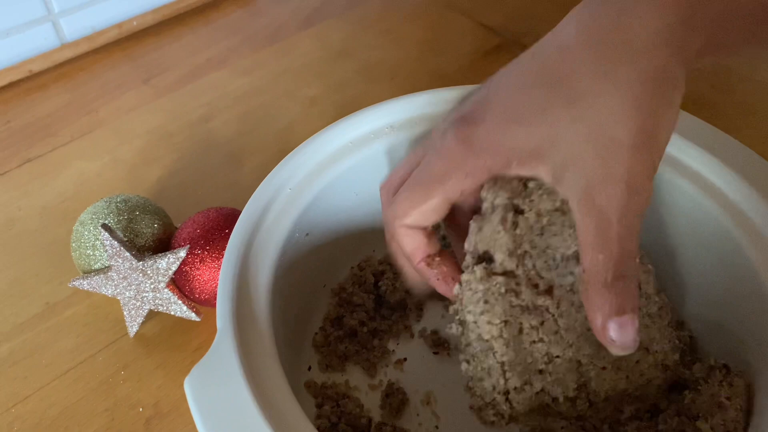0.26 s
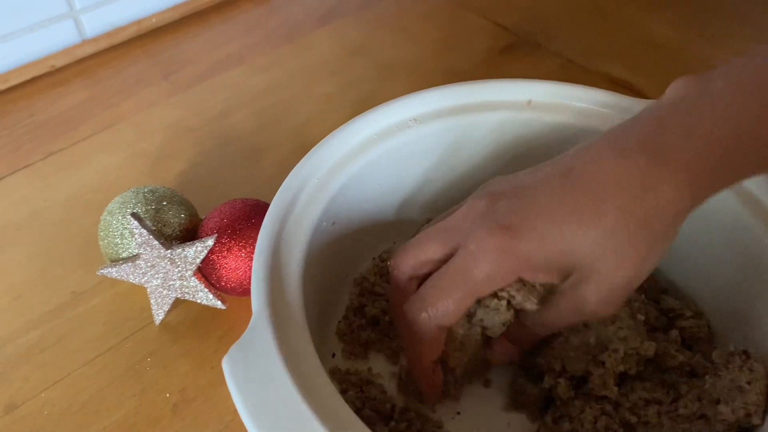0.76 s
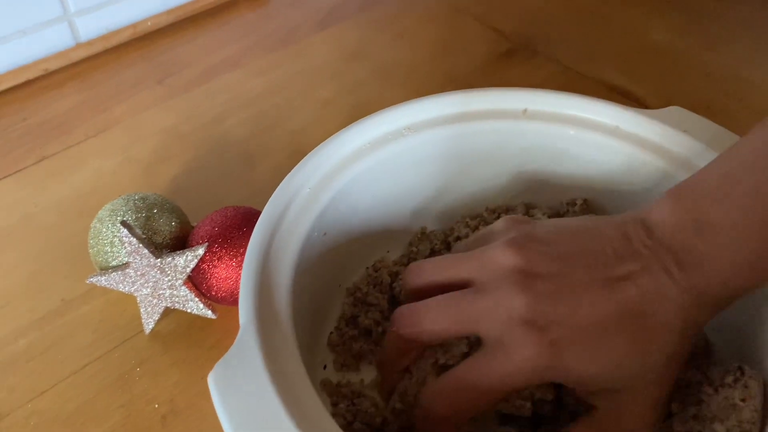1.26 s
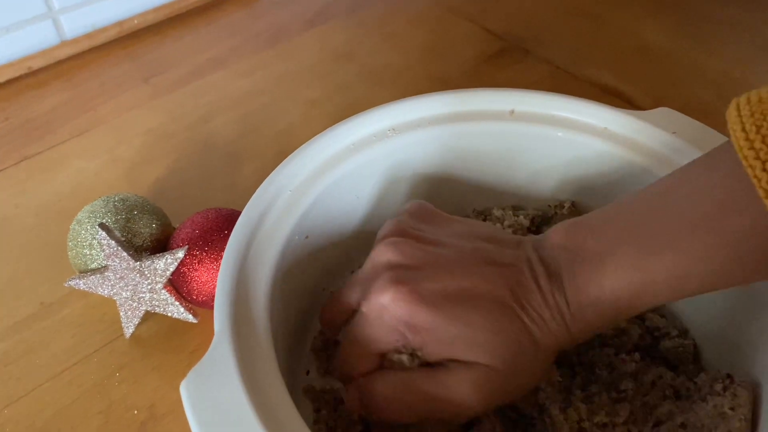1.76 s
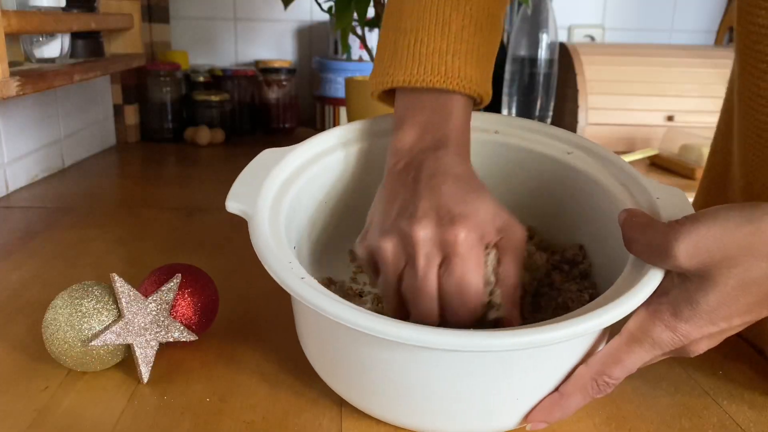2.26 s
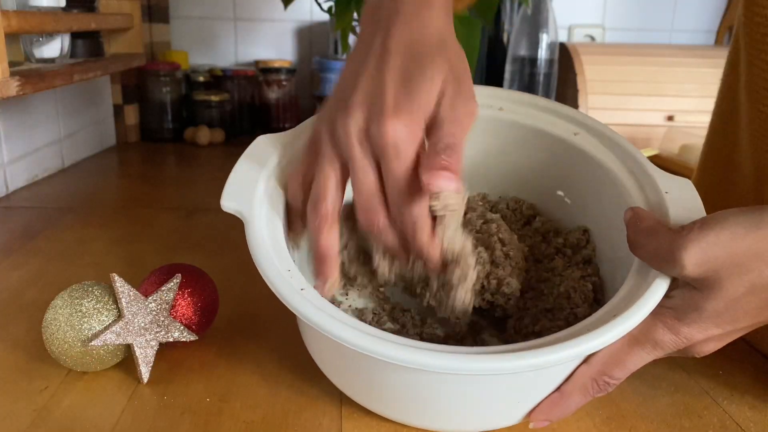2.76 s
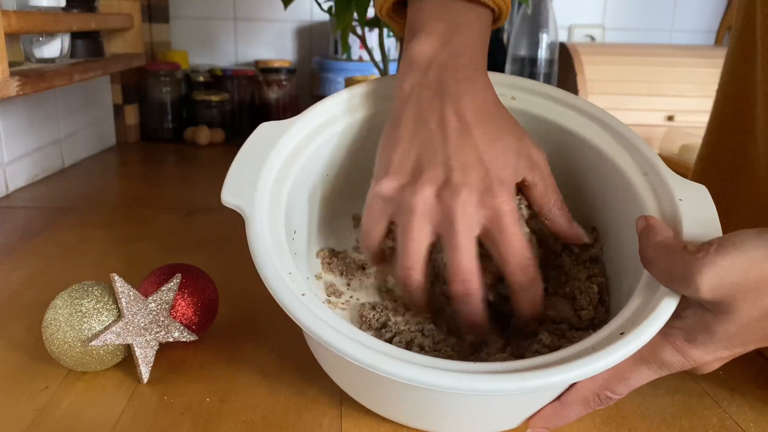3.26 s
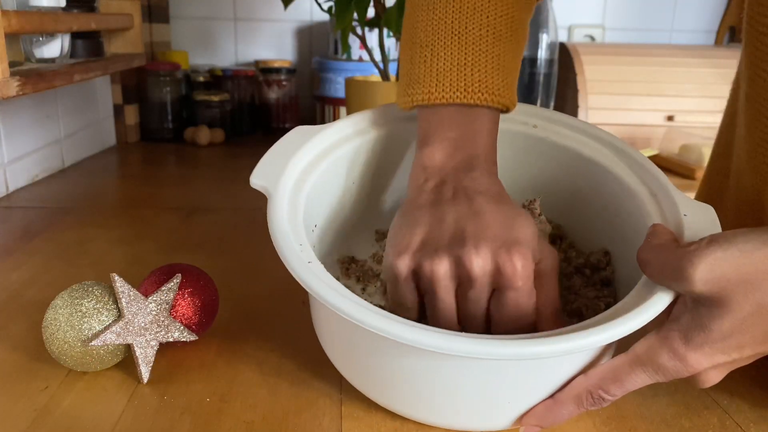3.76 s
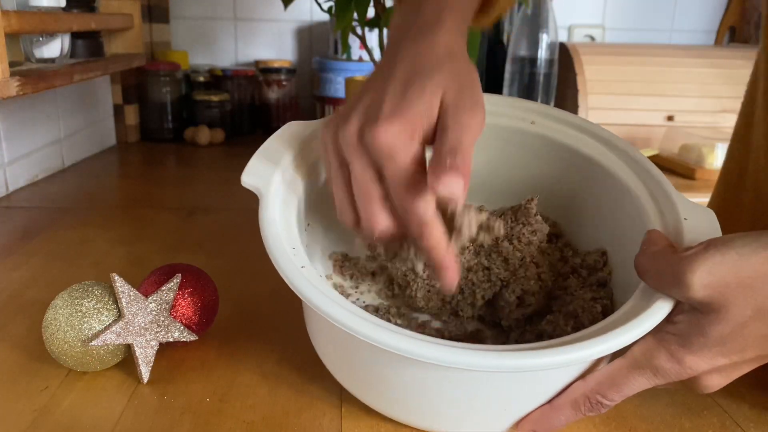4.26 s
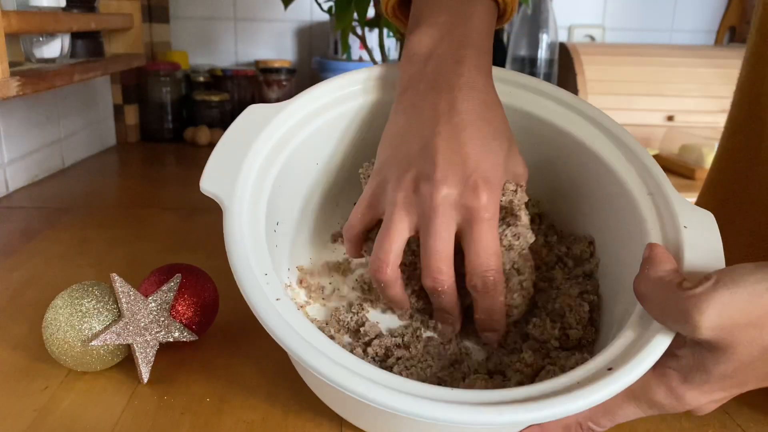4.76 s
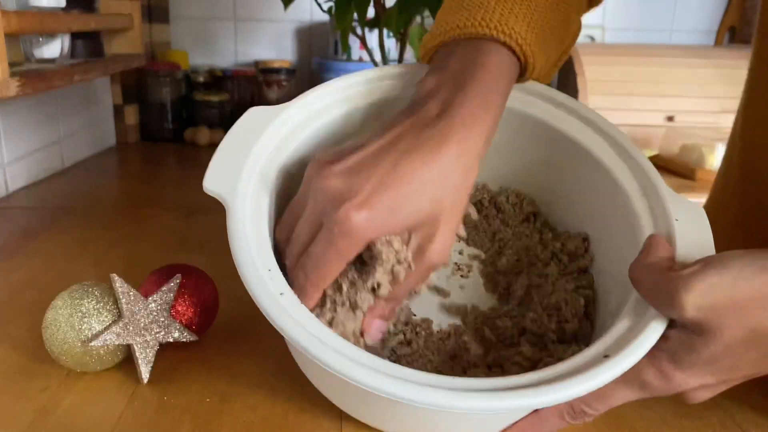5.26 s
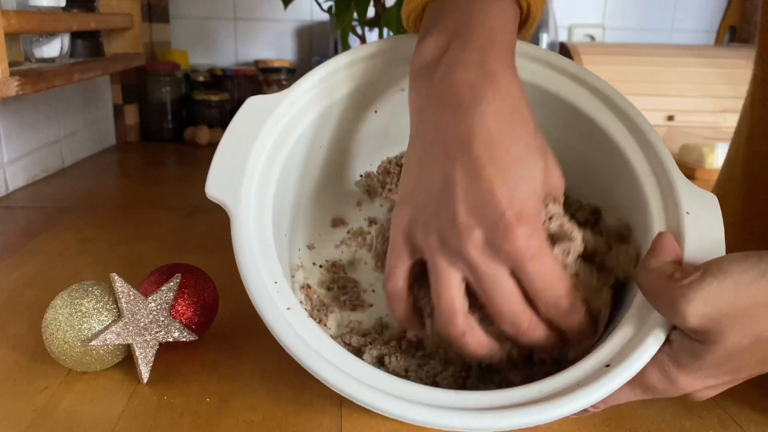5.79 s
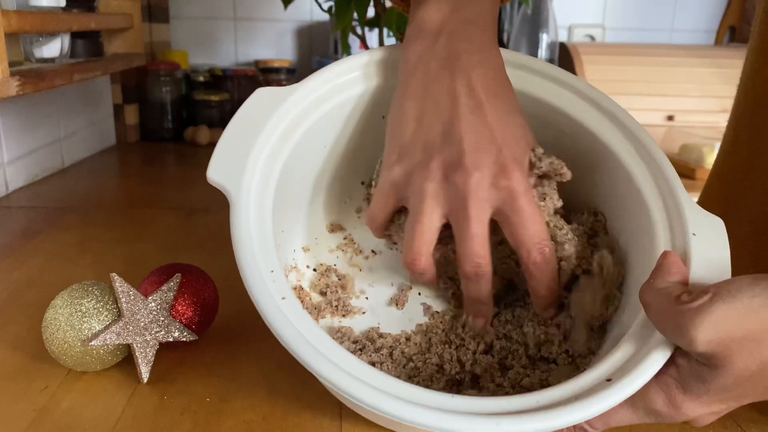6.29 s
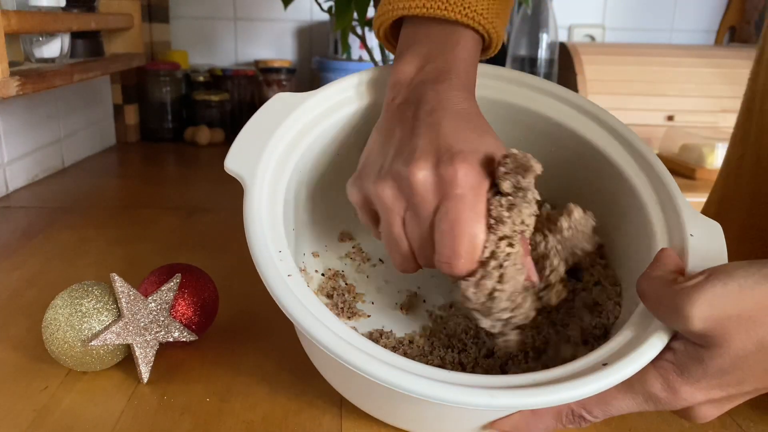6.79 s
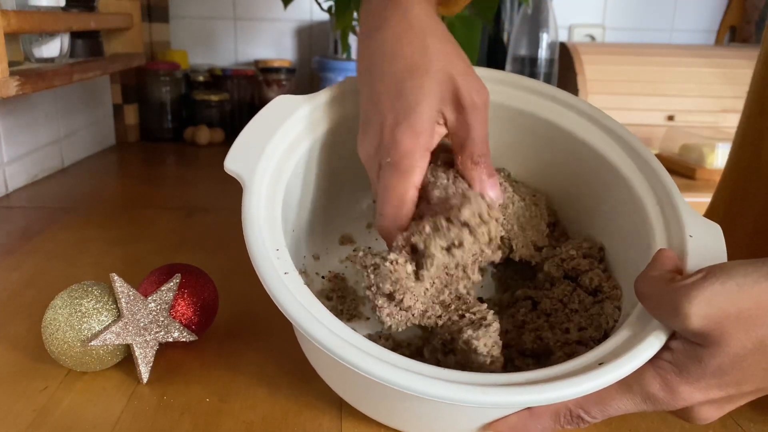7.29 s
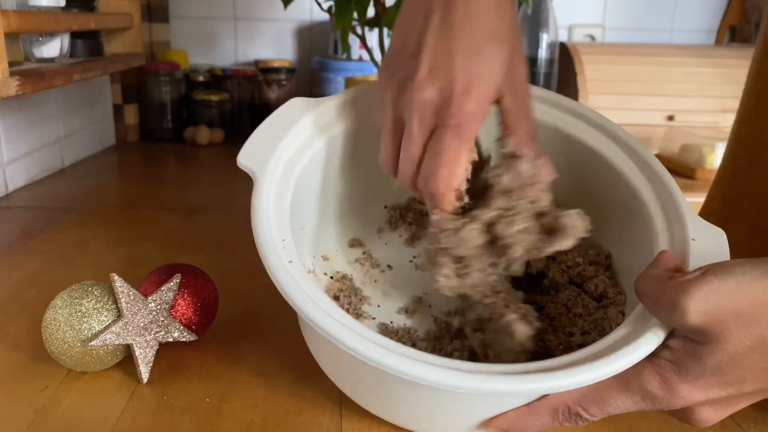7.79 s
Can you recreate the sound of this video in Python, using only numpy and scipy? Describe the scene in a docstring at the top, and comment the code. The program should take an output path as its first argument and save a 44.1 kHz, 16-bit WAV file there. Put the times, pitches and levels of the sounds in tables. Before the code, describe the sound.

Quiet, close kneading of crumbly dough: faint grainy squishes and low table thuds, a hard hollow ceramic clonk, then lighter crumbling in a kitchen.

```python
"""Kneading crumbly dough in a bowl

A hand kneads crumbly dough in a ceramic bowl on a wooden table in a quiet kitchen.
Lumps and knuckles strike ringing modes of the bowl; each push thumps low modes of the table top.
Dragged dough keeps the bowl wall and the table sounding with dense small slips; crumbs rustle as random clicks.
Feedback delays give the kitchen's echo and steady noise its room tone; a pair of close microphone ports listens."""
import sys
import numpy as np
from scipy import signal
from scipy.fft import rfft, irfft, next_fast_len
from scipy.io import wavfile

SR = 44100
rng = np.random.default_rng(int(sys.argv[2]) if len(sys.argv) > 2 else 0)


def wrap_up_sound(samples):
    """Save the sound to the file named by the first command line argument, as 16-bit audio."""
    columns = np.atleast_2d(samples).T
    # keep every value between -1 and 1, then stretch to whole-number steps
    tamed = np.clip(columns, -1, 1)
    steps = np.round(tamed * 32767).astype(np.int16)
    wavfile.write(sys.argv[1], SR, steps)


N = 354563
SIZE = next_fast_len(N + 4096)   # padded transform length [samples]
BINS_HZ = np.maximum(np.arange(SIZE // 2 + 1) * SR / SIZE, 10)
SIDE_VIEW_S = 1.885   # from here on the bowl is heard from its side instead of from above

# Ringing modes of the bowl, low to top:
# (frequency [Hz], level from above [dB], level from the side [dB], decay by 60 dB [s])
BOWL_LOW_MODES = [(477, 5, -9.5, 0.056), (560, -7, -0.5, 0.06), (604.8, 1, -7.5, 0.092),
                  (637, -7, -2.5, 0.06), (679, -0.5, -2, 0.071), (739.3, 1, -6.5, 0.056),
                  (794, -41, -6.5, 0.017), (869, -1, -18.5, 0.084)]
# same columns: (frequency [Hz], level from above [dB], level from the side [dB], decay by 60 dB [s])
BOWL_HIGH_MODES = [(945, -7, -16, 0.036), (1072, -1.5, 3.5, .07), (1173, 3.5, 0.5, 0.043),
                   (1272, -3.5, -6, 0.09), (1454, -4.5, -14.5, 0.057), (1797, -13, 2.5, 0.043),
                   (1973, -11, 1.5, 0.021)]
# same columns: (frequency [Hz], level from above [dB], level from the side [dB], decay by 60 dB [s])
BOWL_TOP_MODES = [(2479, -11, 0.5, 0.056), (2636, -6, -8, .04), (3030, -27, 0, 0.024), (3510, -26, -8, .05),
                  (4597, -2, -6.5, 0.068), (4950, 2.5, -8, 0.04)]
# Modes of the table top, deep boom:
# (frequency [Hz], level from above [dB], level from the side [dB], decay by 60 dB [s])
TABLE_LOW_MODES = [(62.4, -4, -3.5, 0.18), (96.8, -0.5, -3, 0.15)]
# Modes of the table top, upper thud:
# (frequency [Hz], level from above [dB], level from the side [dB], decay by 60 dB [s])
TABLE_HIGH_MODES = [(139.5, 1.5, 2, 0.099), (165, -8, -5, 0.13), (196, -1, -4, 0.14), (258, 5, -5, .08),
                    (309, 3.5, -6, 0.075), (368, -1.7, -4.5, 0.0796), (420, -0.9, -1, 0.06)]
# Pushes on the table, before layer trims: (time [s], level [dB], upper modes relative to it [dB])
PUSHES = [(0.119, -47, -20), (0.14, -43, -39), (0.622, -48, 1.5), (0.638, -41.5, -15), (0.659, -40, -16),
          (0.799, -50.5, -4.5), (0.857, -46.5, -16), (1.018, -42, -16), (1.066, -41.5, -4),
          (1.133, -29, -7.5), (1.148, -26.5, -14.5), (1.419, -47.5, 2), (1.437, -37.5, -13.5),
          (1.966, -59.5, -9), (2.428, -40.5, -14), (2.615, -53, -13), (2.949, -31.5, -36),
          (3.029, -50, -15), (3.205, -45.5, -5.5), (3.414, -44.5, -9.5), (3.464, -46.5, -6.5),
          (3.994, -39.5, -22.5), (4.028, -56, -26), (4.423, -44, -11), (4.432, -22.5, -8),
          (5.182, -17, -2.5), (5.638, -44, -25), (5.918, -38.5, -13.5), (5.977, -26.5, -7),
          (6.159, -40, -14.5), (6.946, -53, -15), (7.124, -56, -25.5), (7.898, -66.5, 2.5)]
# Dough drags along the wall, before layer trims:
# (time [s], hold [s], wall level [dB], upper wall modes relative to it [dB], load on the table [dB])
DRAG_STROKES = [(0.157, 0.011, -71.5, -7, -48), (0.35, 0.011, -73, 2, -86), (0.632, 0.033, -57.5, 2.5, -47),
                (0.814, 0.023, -69.5, -5, -47.5), (1.092, 0.11, -59, -23, -41.5),
                (1.364, 0.0071, -78, 4, -76), (1.444, .01, -57.5, -11, -52), (1.68, .01, -75, -4, -75),
                (1.955, 0.027, -59, -2, -56), (2.076, 0.087, -60, -24, -60), (2.389, .01, -56, -14, -66),
                (2.526, 0.11, -73.5, -7.5, -70), (2.736, 0.032, -65, -6, -70),
                (2.977, .11, -67, -20, -55.5), (3.196, 0.071, -61, -8.5, -62), (3.382, 0.011, -61, -5, -77),
                (3.581, 0.017, -57, -10, -62.5), (4.03, 0.023, -58.5, -8.5, -57.5),
                (4.38, 0.039, -74, -12, -46), (4.473, 0.019, -49.5, -8, -38.5), (4.578, 0.14, -62, -5, -53),
                (4.856, 0.2, -69.5, -5, -77), (5.078, 0.024, -71, -10, -75), (5.12, .04, -57, -18.5, -73),
                (5.21, .01, -36, -13.5, -37), (5.25, .02, -42.5, -12, -41.5),
                (5.319, 0.044, -37.5, -14.5, -45.5), (5.46, 0.14, -53.5, -5.5, -54.5),
                (5.632, 0.045, -49.5, -17, -48.5), (5.742, 0.026, -51.5, -14.5, -54),
                (5.93, 0.025, -50.5, -5.5, -39.5), (6.118, 0.014, -42.5, -28, -40),
                (6.217, 0.032, -57, -5, -44), (6.347, .01, -57, -15, -58.5), (6.45, 0.3, -71.5, -9, -71),
                (6.839, 0.0071, -66.5, -7, -83), (7.019, 0.0069, -70, 0, -65.5),
                (7.146, 0.015, -69.5, -11, -67), (7.348, 0.22, -77.5, -9.5, -87),
                (7.96, .02, -69.5, -11.5, -73)]


def knocks():
    """Each knock rings the bowl modes, with a dull puff of dough and a snap of crushed crumbs."""
    # Knocks on the bowl, before layer trims: (time [s], level [dB], upper modes relative to it [dB],
    # snap relative to it [dB], favoured pitch before a 40 Hz lift [Hz])
    knock_list = [(0.151, -63.5, 5, -9, 651), (0.344, -63, 13, 10.5, 525), (0.361, -60.5, -21, 6.5, 750),
                  (0.493, -84, 8, 22, 716), (0.588, -62, 6.5, 9, 510), (0.62, -49, -20, -23, 493),
                  (0.698, -65, 7, 7, 622), (0.8, -58, 0.5, -2, 504), (1.066, -45, -4.5, -15.5, 470),
                  (1.133, -34, -8, -29, 490), (1.418, -43.5, -21, -34, 500), (1.689, -69, 10, -1, 525),
                  (1.941, -46.5, 1.5, -3.5, 555), (1.955, -46.5, 3, 2.5, 616), (1.972, -46, 1, 1, 569),
                  (1.991, -44, 0, -5, 575), (2.067, -42, -2, -8.5, 550), (2.158, -57.5, 7, -5, 716),
                  (2.372, -50, -22, -10, 543), (2.697, -47.5, -27, -6.5, 562),
                  (3.009, -47.5, -33, -22, 745), (3.029, -63, -11, 2.5, 616), (3.18, -53, -1.5, -6, 556),
                  (3.209, -53.5, 5, -1, 695), (3.253, -60, -1.5, 9, 534), (3.366, -56.5, 8.5, 8, 581),
                  (3.398, -56, 2, 1, 598), (3.466, -53, -5, -7, 598), (3.58, -52.5, -6.5, -29, 761),
                  (3.669, -63, -3, -11, 563), (3.987, -66, 12, 16.5, 627), (4.044, -46, -24, -14, 710),
                  (4.371, -47.5, -31, -32, 560), (4.434, -27, -30, -23.5, 519.2),
                  (4.597, -50, -7, -14, 740), (4.721, -52, -8.5, -3, 715), (5.113, -49.5, -21, -9, 660),
                  (5.179, -3, -25, -28, 548), (5.309, -36, -13, -21, 592), (5.447, -41, -24, -8, 600),
                  (5.644, -42.5, -32.5, 1.5, 574), (5.91, -54, -14.5, 3, 538), (5.98, -30, -36, -43, 521.6),
                  (6.113, -47, -47, -29, 550), (6.206, -42, -16, -7, 645), (6.213, -38.5, -26, 0.5, 650),
                  (6.219, -47.5, -6, 15, 660), (6.221, -22.5, -22, -44, 693.7), (6.228, -35, -37, -27, 720),
                  (6.319, -50.5, -13, -9, 702), (6.387, -51, -13, -11, 731), (6.453, -53.5, -18.5, -6, 560),
                  (6.591, -50.5, -12, -10, 585), (6.82, -54.5, -19.5, -3.5, 686), (6.84, -51, -9, -1, 666),
                  (6.939, -59.5, -11.5, -19.5, 664), (6.998, -54.5, -15, -0.5, 680),
                  (7.149, -58.5, -2.5, -4, 674), (7.46, -62, -6, 19.5, 713),
                  (7.535, -56.5, -29, -21.5, 708), (7.943, -59.5, -11, -5, 719),
                  (8.017, -56.5, -38, -31.5, 565)]
    # Dull puff of a landing lump: (frequency [Hz], density [dB per Hz])
    thud_spectrum = [(300, -13.5), (700, -2.5), (1100, 3.4), (1600, -5), (2600, -18), (6000, -34.5)]
    # Snap of crushed crumbs: (frequency [Hz], density [dB per Hz])
    snap_spectrum = [(900, -9.5), (1800, -6), (2800, 2.5), (5000, -5.5), (9000, -9), (16000, -16)]
    seconds, level_db, upper_db, snap_db, low_hz = np.transpose(knock_list)

    # the left-right place and the favoured top pitch scatter from knock to knock
    pan_luck, pitch_luck = rng.standard_normal((2, len(seconds)))
    pan_db = heard_db(seconds, -2, 2.5) + 2.5 * pan_luck
    top_hz = 2900 * 2 ** (0.097 * pitch_luck)

    low = struck(BOWL_LOW_MODES, seconds, level_db + 3.0, pan_db, contact_s=.00008, chatter_s=0.00021,
                 scatter_db=1.4, port_s=.00025, favour_hz=low_hz + 40, focus_db=32)
    high = struck(BOWL_HIGH_MODES, seconds, level_db + upper_db + 4, pan_db / 2, contact_s=.000012,
                  chatter_s=.00012, scatter_db=1.8, port_s=0.00043, favour_hz=1110)
    top = struck(BOWL_TOP_MODES, seconds, level_db + snap_db - 7.5, pan_db / 2, contact_s=.00002,
                 chatter_s=.0015, scatter_db=2.9, port_s=.00005, favour_hz=top_hz, focus_db=16.0)
    thud = puff(seconds, level_db + 0.49 * upper_db - 12.5, .0005, 0.019, thud_spectrum)
    snap = puff(seconds, level_db + snap_db - 7.5, 0.00035, 0.0053, snap_spectrum)
    return low + high + top + thud + snap


def thumps():
    """Soft pushes set the table top ringing: its deep boom and its upper thud, apart."""
    seconds, level_db, upper_db = np.transpose(PUSHES)
    boom = struck(TABLE_LOW_MODES, seconds, level_db + 2.0, np.full(len(seconds), 1.5), contact_s=0.0017,
                  chatter_s=0.0022, scatter_db=.8, port_s=0.00017, favour_hz=80)
    thud = struck(TABLE_HIGH_MODES, seconds, level_db + upper_db + 10.0, np.full(len(seconds), .8),
                  contact_s=0.00017, chatter_s=.008, scatter_db=1.9, port_s=.0005, favour_hz=230)
    return boom, thud


def wall_drag(rustle_db):
    """Dragged dough slips along the bowl wall and keeps its modes sounding."""
    seconds, hold_s, wall_db, upper_db, _ = np.transpose(DRAG_STROKES)
    rise_s, fall_s = 0.0706, .1   # time to grow or fade by 20 dB
    wall = strokes(seconds, wall_db, rise_s, hold_s, fall_s, rest_db=-93.5)
    upper = strokes(seconds, wall_db + upper_db, rise_s, hold_s, fall_s, rest_db=-97.5)
    # the top modes sing when crumbs scrape while the wall is loaded
    top = 0.83 * rustle_db + 0.31 * np.minimum(wall, -52) - 0.5
    return (rubbed(BOWL_LOW_MODES, wall - 3, per_s=900, spread_db=1.2, patchy_db=2.6)
            + rubbed(BOWL_HIGH_MODES, upper - 3, per_s=1500, spread_db=4.1, patchy_db=3.0)
            + rubbed(BOWL_TOP_MODES, top, per_s=2300, spread_db=1.4, patchy_db=2.9))


def table_rumble():
    """The loaded table rumbles under the drags; its upper modes also shake on after each push."""
    seconds, hold_s, wall_db, _, load_db = np.transpose(DRAG_STROKES)
    push_s, push_db, push_upper_db = np.transpose(PUSHES)
    # rise and fall are times for 20 dB
    low = strokes(seconds, load_db, 0.02, hold_s, 0.1314, rest_db=-78.5)
    shake_s = np.r_[seconds, push_s]
    shake_hold_s = np.r_[hold_s, 0 * push_s]
    shake_db = np.r_[wall_db - 4, push_db + push_upper_db - 3.5]
    upper = strokes(shake_s, shake_db, .012, shake_hold_s, 0.12, rest_db=-88)
    return (rubbed(TABLE_LOW_MODES, low - 3, per_s=390, spread_db=2.2, patchy_db=2.3)
            + rubbed(TABLE_HIGH_MODES, upper - 3, per_s=600, spread_db=3.0, patchy_db=0.61))


def rustling():
    """Level of the crumbs as they shift, and of their top treble relative to that, both in dB."""
    # Crumb shifts, before layer trims: (time [s], level [dB], top treble relative to it [dB],
    # rise by 20 dB [s], hold [s], fall by 20 dB [s])
    rustle_list = [(0.022, -63.5, -5.5, 0.017, .002, 0.022), (0.378, -63, -10.5, 0.01, 0.0022, 0.021),
                   (0.472, -80.5, 4.5, 0.12, 0.051, 0.19), (0.641, -61, -8.5, 0.22, 0.017, 0.065),
                   (0.784, -73.5, -1.5, 0.15, .005, 0.093), (1.063, -79, -6, .02, .005, 0.077),
                   (1.13, -71.5, -3, 0.026, 0.6, 0.21), (1.39, -68.5, -3, 0.12, .01, .3),
                   (1.954, -73, -3.5, 0.19, 0.42, 0.18), (2.394, -69, -14, 0.11, 0.066, .05),
                   (2.587, -63.5, -10, .15, 0.061, 0.048), (2.693, -67.5, -4, 0.023, 0.11, 0.12),
                   (2.942, -78.5, -3, .04, .005, 0.054), (3.024, -77.5, -9, 0.041, .01, 0.16),
                   (3.207, -75.5, -6, .07, 0.76, 0.11), (3.378, -70.5, -11, .04, .005, .12),
                   (3.989, -57, -9.5, 0.012, 0.0053, 0.15), (4.344, -85, 6, 0.035, 0.024, .1),
                   (4.433, -67, -10.5, 0.097, .005, 0.47), (4.616, -62.5, -9, 0.032, .004, 0.063),
                   (4.714, -70.5, -7, 0.069, .14, 0.2), (5.005, -75.5, -7.5, 0.11, 0.056, .2),
                   (5.193, -56.5, -15.5, 0.097, 0.021, 0.11), (5.351, -53, -13, 0.13, .004, 0.044),
                   (5.55, -53, -11, 0.33, 0.091, 0.24), (5.705, -61, -4.5, 0.082, 0.019, 0.087),
                   (5.944, -58.5, -10.5, 0.067, 0.0045, 0.05), (6.1, -75, -8.5, .2, 0.11, .1),
                   (6.228, -62, -15, 0.058, .004, 0.12), (6.462, -67.5, -7.5, 0.52, 0.26, 0.33),
                   (6.896, -68.5, -9.5, 0.32, .015, .08), (7.027, -63.5, -6, .07, 0.047, 0.081),
                   (7.138, -76.5, -2.5, .1, 0.072, 0.61), (7.478, -70.5, -4.5, 0.11, .01, 0.44),
                   (7.83, -80.5, 2.5, 0.22, .01, 0.033), (7.945, -65, -8.5, .04, .002, 0.026)]
    seconds, level_db, top_db, rise_s, hold_s, fall_s = np.transpose(rustle_list)
    rustle = strokes(seconds, level_db, rise_s, hold_s, fall_s, rest_db=-100)
    top = strokes(seconds, level_db + top_db, rise_s, hold_s, fall_s, rest_db=-88)
    return rustle, top - rustle


def crumbs(level_db, top_db):
    """Dry crumbs shift and crush: dense grains and sparser crackles; each band swells in its own patches."""
    # Colour of the rustle: (frequency [Hz], density [dB per Hz])
    crumb_spectrum = [(700, -23.5), (1500, -13), (2300, -7), (3500, -2), (6000, -4.5), (9000, 1),
                      (12500, -0.5), (16000, -4)]
    hiss = rms_one(grains(27000, 0.87)) * amp(0.73 * drift(34))
    crackle = amp(-10.0) * rms_one(grains(300 * amp(4.5 * drift(8.68)), 4.0))
    spectrum = rfft(rms_one(coloured(hiss + crackle, crumb_spectrum)), SIZE)
    place = 2 * np.log2(np.clip(BINS_HZ, 1500, 8500) / 1500)   # half octaves above 1500 Hz
    out = 0
    for k in range(6):   # overlapping half-octave bands; the last holds the top treble
        weight = np.maximum(1 - np.abs(np.minimum(place, 5) - k), 0)
        band = irfft(spectrum * weight, SIZE)[:, :N]
        swell_db = top_db + 3.5 if k == 5 else 2.5 * drift(21)
        out = out + band * amp(swell_db)
    return amp(level_db + 5.5) * out


def kitchen(x):
    """Room echo: six feedback delays a side, duller on every round."""
    t60_s, wall_cut_hz = 0.44, 4340   # decay before the dulling; corner of the dulling
    size = next_fast_len(N + SR)
    w = 2 * np.pi * np.arange(size // 2 + 1) / size
    dull = 1 / (1 + 1j * w * SR / (2 * np.pi * wall_cut_hz))
    tails = np.zeros((2, len(w)), complex)
    for k, lag in enumerate(rng.uniform(.009, 0.032, 12) * SR):
        once = amp(-60 * lag / SR / t60_s) * dull * np.exp(-1j * w * lag)
        tails[k % 2] += (-1) ** (k // 2) * once / (1 - once)   # endless rounds of one delay
    return irfft(rfft(x, size) * tails, size)[:, :N]


def room_tone():
    """Steady quiet noise of the room: very dense random clicks, coloured."""
    # Colour of the room tone: (frequency [Hz], density [dB per Hz])
    air_spectrum = [(15, -24), (25, -1.5), (76, 1), (220, -12), (460, -14.5), (650, -13.5), (830, -20.5),
                    (1100, -19), (1630, -28), (2500, -29), (8000, -30), (16000, -31.5)]
    return amp(-73) * rms_one(coloured(grains(60000, 0.66), air_spectrum))


def struck(modes, seconds, peak_db, pan_db, contact_s, chatter_s, scatter_db, port_s, favour_hz, focus_db=0):
    """A blow is a smooth push and three weaker touches; it strikes every mode with a strength of its own."""
    hz, above_db, side_db, t60 = np.transpose(modes)[:, :, None]
    octaves = np.log2(hz / favour_hz)
    # the place of the blow favours one pitch
    mode_db = heard_db(seconds, above_db, side_db) - focus_db * np.abs(octaves)
    gains = amp(mode_db + scatter_db * rng.standard_normal((len(modes), len(seconds))))
    # modes under and over that pitch start in opposition, so the ring swells
    gains = np.sign(octaves) * gains / gains.sum(axis=0) * amp(peak_db)
    later = rng.random((3, len(seconds))) * chatter_s
    # each mode radiates from its own part of the body
    port_lags = rng.uniform(-port_s, port_s, len(modes)) * SR
    out = np.zeros((2, N))
    for gain, mode_hz, mode_t60, port_lag in zip(gains, hz[:, 0], t60[:, 0], port_lags):
        force = np.zeros((2, N + SR))
        for lag, share in zip([0, *later], [1, 0.74, -0.54, 0.56]):
            at = np.round((seconds + lag) * SR).astype(int)
            np.add.at(force, (slice(None), at), share * panned(pan_db) * gain)
        force[1] = np.roll(force[1], round(port_lag))
        out += ring(force[:, :N], mode_hz, mode_t60)
    r = np.exp(-1 / (contact_s * SR))   # the contact time smooths the push
    return signal.lfilter([(1 - r) ** 2], [1, -2 * r, r * r], out)


def rubbed(modes, level_db, per_s, spread_db, patchy_db):
    """Dense small slips keep the modes of a body sounding."""
    slips = grains(per_s, spread_db) * amp(patchy_db * drift(25))
    t = np.arange(N) / SR
    rings = 0
    for k, (hz, above_db, side_db, t60) in enumerate(modes):
        rings = rings + (-1) ** k * amp(heard_db(t, above_db, side_db)) * ring(slips, hz, t60)
    # even loudness before and after the view changes to the side, then the level curve
    cut = round(SIDE_VIEW_S * SR)
    return amp(level_db) * np.hstack([rms_one(rings[:, :cut]), rms_one(rings[:, cut:])])


def puff(seconds, peak_db, rise_s, fall_s, spectrum):
    """A burst of noise at every blow, rising fast and dying away exponentially."""
    starts = np.zeros(N)
    np.add.at(starts, np.round(seconds * SR).astype(int), amp(peak_db))
    rise, fall = np.exp(-1 / (rise_s * SR)), np.exp(-1 / (fall_s * SR))
    shape = signal.lfilter([1 - rise], np.convolve([1, -rise], [1, -fall]), starts + 1e-18)
    return shape * rms_one(coloured(grains(18000, 1.8), spectrum))


def strokes(seconds, peak_db, rise_s, hold_s, fall_s, rest_db):
    """Level in dB at every sample: each stroke grows, holds and fades; powers add over a resting level."""
    t = np.arange(0, N / SR + .002, .002)[:, None]
    before = (seconds - t) / np.maximum(rise_s, .005)
    after = (t - seconds - hold_s) / np.maximum(fall_s, .005)
    under = np.maximum(np.maximum(before, after), 0)   # in steps of 20 dB
    power = np.sum(amp(peak_db - 20 * under) ** 2, axis=1) + amp(rest_db) ** 2
    return np.interp(np.arange(N) / SR, t[:, 0], 10 * np.log10(power))


def grains(per_s, spread_db):
    """Stereo source of uneven random clicks, as alike left and right as the ports hear them."""
    # Likeness of the two ports: (frequency [Hz], left-right likeness [0 to 1])
    likeness = [(60, 1), (300, 0.64), (800, 0.1), (2200, 0.46), (5000, 0.41), (7500, 0.91), (9000, 1),
                (16000, 0.95)]
    # Balance of the two ports: (frequency [Hz], left over right [dB])
    lean = [(60, 1), (300, 0.5), (650, 3.5), (1200, 1), (5000, 3), (7000, 0.6), (16000, -0.5)]
    sizes = amp(spread_db * np.minimum(rng.exponential(1, N), 4)) * (rng.random(N) < per_s / SR)
    mid, side = rfft(sizes * rng.standard_normal((2, N)), SIZE)
    alike = np.clip(at_hz(likeness, BINS_HZ), 0, 1)
    both = np.sqrt(1 + alike) * mid + np.sqrt(1 - alike) * side * [[1], [-1]]
    return irfft(both * panned(at_hz(lean, BINS_HZ)), SIZE)[:, :N]


def ring(force, hz, t60):
    """A two-pole resonator: a unit click starts a decaying sine of height 1."""
    r, w = amp(-60 / (t60 * SR)), 2 * np.pi * hz / SR
    return signal.lfilter([0, np.sin(w)], [1, -2 * r * np.cos(w), r * r], force + 1e-18)


def coloured(x, spectrum):
    """Stereo signal filtered through a spectrum table."""
    return irfft(rfft(x, SIZE) * amp(at_hz(spectrum, BINS_HZ)), SIZE)[..., :N]


def drift(rate):
    """Slow random wander of spread 1: noise through two equal low-passes with their corner at rate in Hz."""
    r = np.exp(-80 * np.pi * rate / SR)   # one step every 40 samples
    noise = rng.standard_normal(N // 40 + 2002)
    slow = signal.lfilter([1], [1, -2 * r, r * r], noise)[2000:]   # settled part
    return np.interp(np.arange(N) / 40, np.arange(len(slow)), rms_one(slow))


def heard_db(seconds, above_db, side_db):
    """Level from where the microphone stands: above the bowl, then at its side."""
    return np.where(seconds < SIDE_VIEW_S, above_db, side_db)


def panned(db):
    """Left and right gains of a left-right difference in dB."""
    return amp(np.multiply.outer([.5, -.5], db))


def at_hz(points, hz):
    """Value of a table, interpolated over log frequency."""
    table_hz, values = np.array(points).T
    return np.interp(np.log(hz), np.log(table_hz), values)


def rms_one(x):
    """Signal scaled to rms 1."""
    return x / np.sqrt(np.mean(x ** 2) + 1e-20)


def amp(db):
    """Gain of a level in dB."""
    return 10 ** (np.asarray(db) / 20)


def scene():
    """Blows with their room echo, over the running sounds of kneading and the room tone."""
    rustle_db, top_db = rustling()
    boom, thud = thumps()
    blows = knocks() + thud
    room = amp(-22.5) * kitchen((blows + amp(-8) * boom).mean(axis=0))
    running = wall_drag(rustle_db) + table_rumble() + crumbs(rustle_db, top_db)
    return blows + boom + room + running + room_tone()


def record(dry):
    """The top treble reaches the right port late; rumble is cut, high peaks rounded, the top cut."""
    late_from_hz, turn_hz = 7094, 3950   # above the first, the phase turns a full circle per turn_hz
    late = np.exp(-2j * np.pi * np.maximum(BINS_HZ - late_from_hz, 0) / turn_hz)
    right = irfft(rfft(dry[1], SIZE) * late, SIZE)[:N]
    ports = np.stack([dry[0], right])
    ports = signal.sosfilt(signal.butter(2, 35, "high", fs=SR, output="sos"), ports)
    ports = ports / (1 + np.abs(ports / .93) ** 6) ** (1 / 6)   # soft ceiling at 0.93
    return signal.sosfilt(signal.cheby2(14, 60, 16000, fs=SR, output="sos"), ports)


dry = scene()
out = record(dry)
wrap_up_sound(out)
```